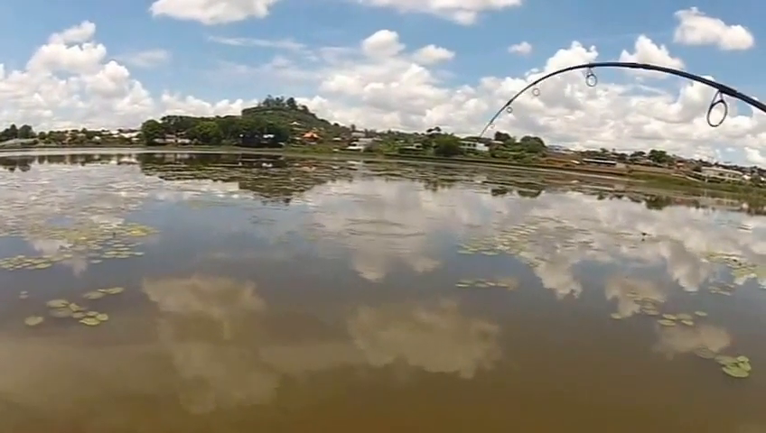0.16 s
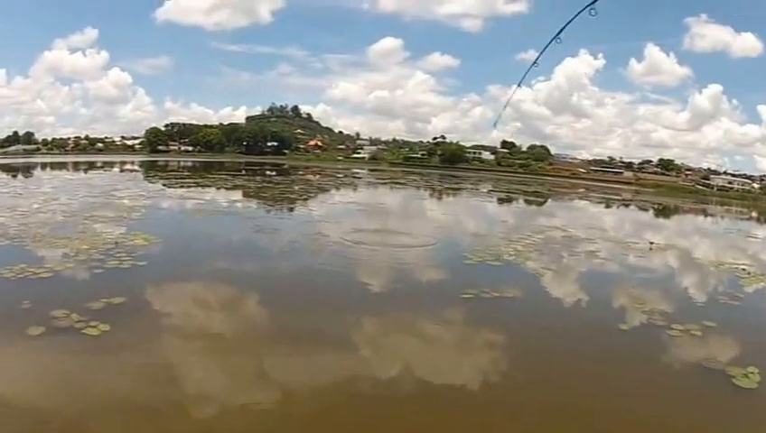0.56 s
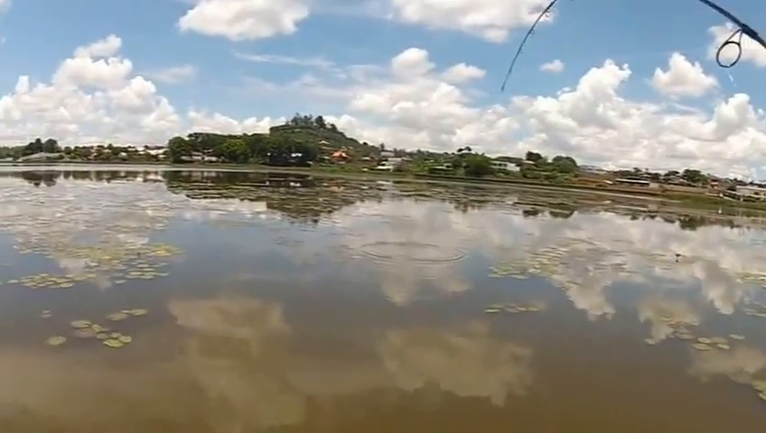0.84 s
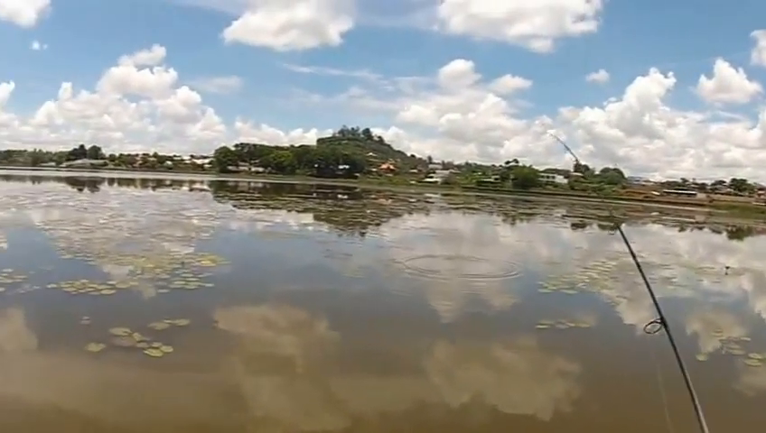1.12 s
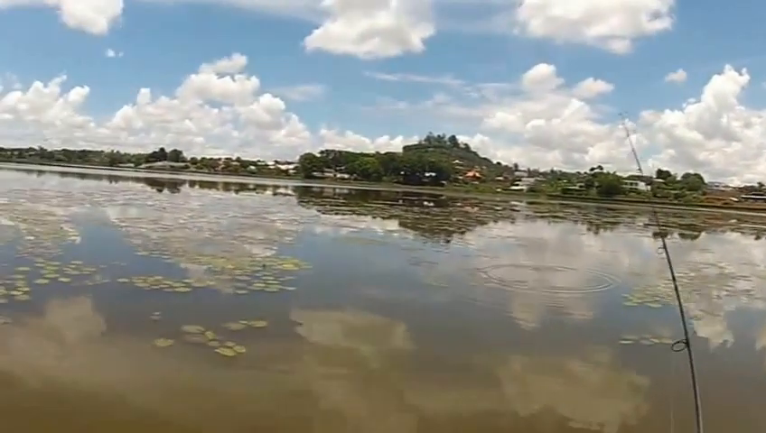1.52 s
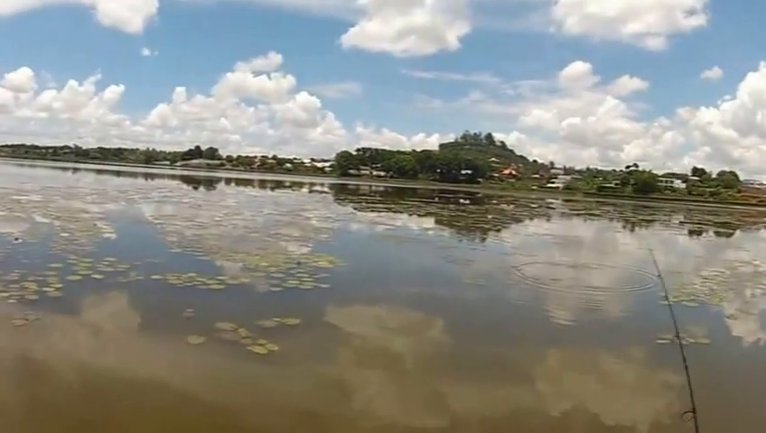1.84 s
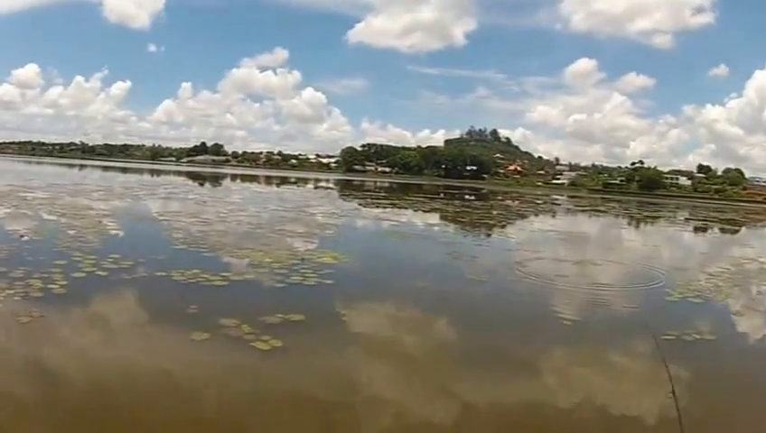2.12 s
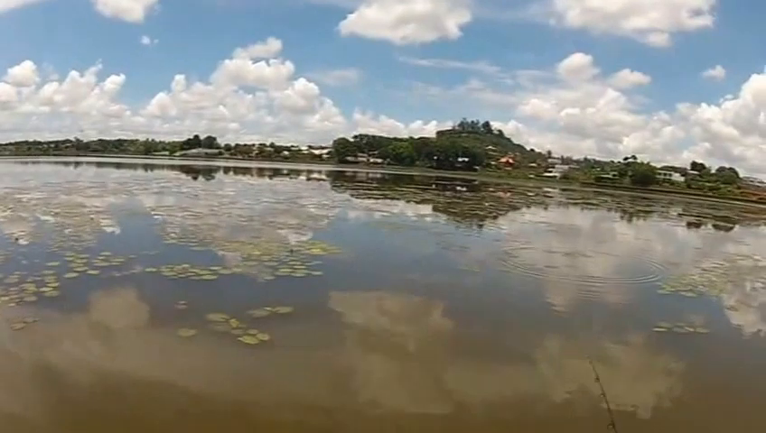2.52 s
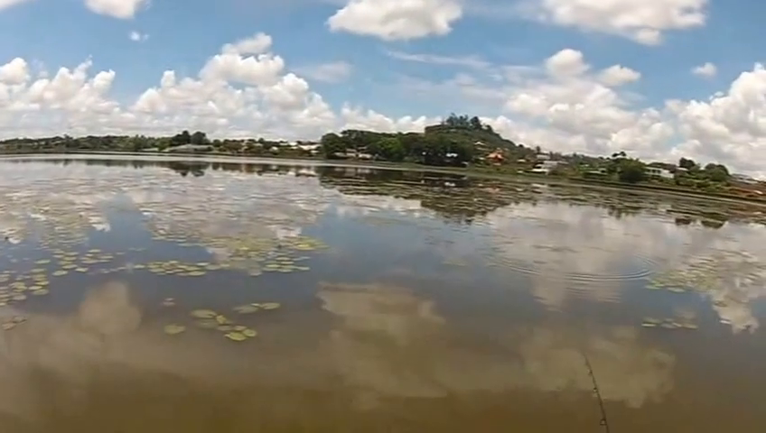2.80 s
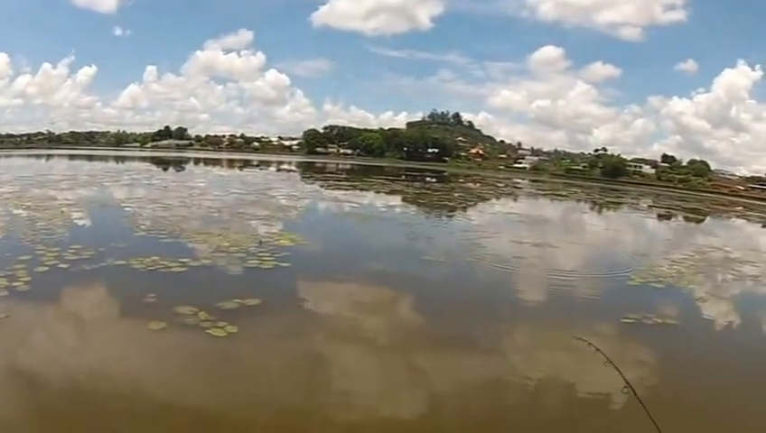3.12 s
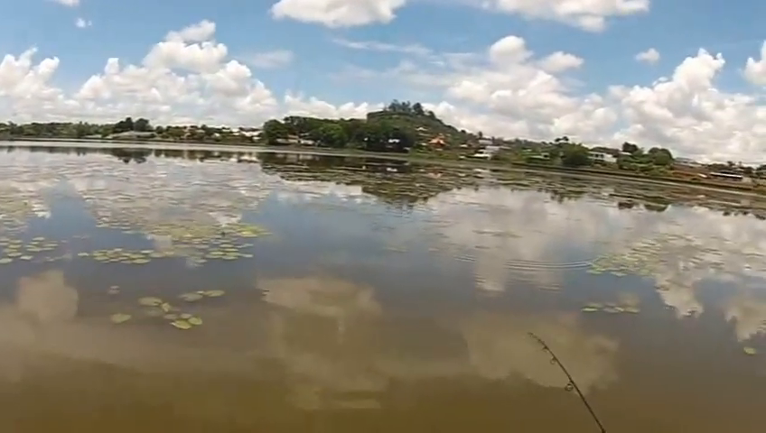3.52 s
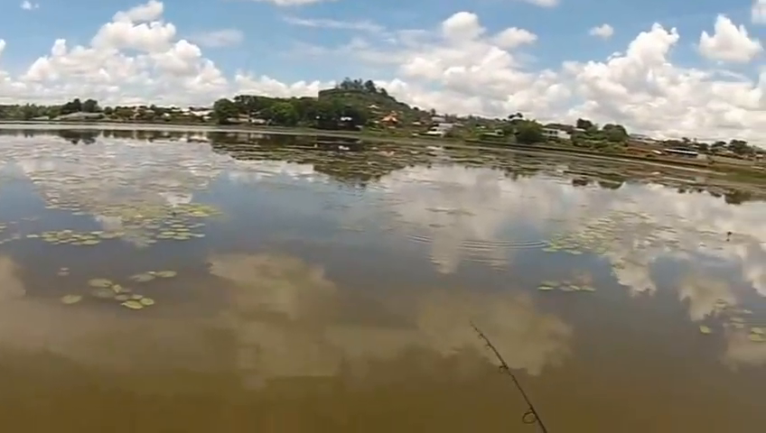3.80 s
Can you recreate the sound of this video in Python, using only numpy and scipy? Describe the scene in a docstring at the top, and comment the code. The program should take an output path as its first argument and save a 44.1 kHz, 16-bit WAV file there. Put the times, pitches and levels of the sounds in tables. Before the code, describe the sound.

A fishing reel clicks and whirs in short metallic bursts beside a calm lake, close up.

```python
"""Beside a calm lake, a fishing reel gives line in short pulls, close to the microphone.
At each tooth the drag's pawl snaps, chatters for a few milliseconds and sets the metal spool ringing;
one pull is fast enough to whir. Snaps are shaped noise, and the ringing is made of dying sine waves.
Behind the reel, filtered noise makes a low outdoor rumble, faint ticks of handling and a few soft bumps."""
import sys
import numpy as np
from scipy import signal
from scipy.io import wavfile
from scipy.ndimage import uniform_filter1d

SR = 44100
rng = np.random.default_rng(int(sys.argv[2]) if len(sys.argv) > 2 else 0)


def put_to_file(sound):
    """Save the sound as 16-bit audio at rate SR, in the file named by the first command-line argument."""
    columns = np.atleast_2d(sound).T  # one column per channel
    safe = np.clip(columns, -1, 1)
    whole_steps = np.round(safe * 32767)
    wavfile.write(sys.argv[1], SR, whole_steps.astype(np.int16))


N = 174195  # length in samples

# The outdoor background. Each row: frequency in Hz, relative level in dB.
AIR_COLOUR = [(26, -42.5), (44, -15), (66, 1), (130, -5.5), (1000, -16), (1800, -23), (3000, -31.5),
              (10500, -46), (16000, -59)]
# How alike the background is at the two ears. Each row: frequency in Hz, likeness (1 is identical).
EAR_LIKENESS = [(90, 0.9), (350, 0.45), (800, 0.05)]
# Rustles of the hand on the rod. Each row: middle in seconds, level in dB, half length in seconds.
RUSTLES = [(1.415, -61, .012), (1.8, -70, .3), (1.958, -60, .012)]
# Teeth passing the pawl. Each row: start in seconds, snap strength in dB,
# then the pawl's ping and the spool's ring, both in dB added to that strength.
TEETH = [(0.0, -39, 9, 7), (0.0211, -23, -3, -11), (0.0396, -28, 4, 4.5), (0.0547, -27, -7, 1),
         (0.0718, -27.5, -1.0, 1), (0.0859, -26, -6, 2.5), (0.1033, -25, -4, 2), (0.1159, -28.0, -9, 10),
         (0.1392, -27, -6, 8.5), (0.1517, -26, -4, -7), (0.1725, -24.5, -12, -2.5), (0.2651, -26.0, 11, 8),
         (0.2973, -23.5, 10.0, -2.5), (0.3265, -25, 8, -2.0), (0.3465, -26.5, 8, 4), (0.3693, -26.0, 3, 1),
         (0.3858, -26.5, 7, 4), (0.4071, -26.5, 9.5, 1.5), (0.4322, -26.5, 2, -1), (0.4712, -26, 10.5, -22),
         (0.529, -24.5, 6.5, -10), (0.564, -25.5, 9.0, -7), (0.597, -27, 4.5, -11), (0.6819, -24.0, 2, 6),
         (0.7014, -26.0, 8, 4.5), (0.7258, -26, -5, 1.5), (0.746, -24.5, -14, -2), (0.7677, -24, -3, -0.5),
         (0.7932, -25.5, 5, -11.0), (0.8134, -23, -2, 1.5), (0.8269, -23.5, 9.5, 0.5),
         (0.8407, -23, 9.0, -2), (0.8545, -24.5, 3.0, 5), (0.8675, -25, 3, -13), (0.8797, -23.5, 2, 5),
         (0.892, -26.5, 4, -5), (0.9043, -27.5, 8, -9.0), (0.9168, -23, -2, -9), (0.9289, -28.5, 12, -10),
         (0.942, -25.5, 13.0, -10), (0.955, -23, 6, -10), (0.9688, -24.0, 7.5, -16),
         (0.9847, -23, 8, -11.0), (0.9979, -26, 13.5, -25), (1.0164, -23.5, 12, -18),
         (1.0318, -22.5, 13, -11), (1.0635, -26.5, 10, -7), (2.7001, -29, 15.5, 7.5),
         (2.7188, -30, 13.5, 6.5), (2.7561, -29.5, 13.5, 5), (2.8268, -24, 9, -3), (2.8624, -24.5, 6, -3),
         (2.904, -25, 7.5, -12), (2.9993, -26, 8, -6), (3.0363, -26.5, 7, -16.0), (3.0792, -24, 3.5, -14),
         (3.1172, -27, 5, -28), (3.1856, -25, 3, -29), (3.2606, -26.5, -0.5, -5), (3.313, -27.0, -3, 4.5),
         (3.3534, -26, 2.5, -9), (3.3682, -32, -3.0, 2), (3.3798, -24, -8, 0.5), (3.3896, -31, -3, 1),
         (3.3987, -26.5, -3, 8.5), (3.4089, -25.5, 15.5, 4), (3.4232, -22, 9.0, -5),
         (3.4325, -24.5, 9.5, -10), (3.4448, -27.5, 19.5, -18), (3.4535, -24, 12, -4),
         (3.4642, -26.5, 6, 5), (3.473, -28, 16, -3), (3.4835, -22.5, 2, 8), (3.493, -26, 4.0, -13),
         (3.5031, -26.5, 10.5, -4.5), (3.5424, -23.5, 3, -3), (3.5502, -30, 4, 3.0), (3.5602, -35, -1, 3),
         (3.5684, -29, -4, 7), (3.5769, -29, -3, 12), (3.5882, -35.5, 9, 6), (3.7094, -34.5, 12, 13.5),
         (3.7204, -32, 13, 11.5), (3.7322, -30, 16.5, 8), (3.7453, -30.5, 9, -1.0), (3.7635, -29, 2, -12)]
# The fast pull. Each row: time in seconds, teeth per second, snap strength in dB,
# then the pawl's ping and the spool's ring, both in dB added to that strength.
FAST_PULL = [(3.598, 125, -30.5, 10, 3), (3.614, 160, -29.5, 16, -2), (3.646, 150, -30, 10, -17),
             (3.668, 120, -27.5, 1.5, -7), (3.703, 130, -28.5, 4, -7)]
# Light touches of the pawl. Each row: start in seconds, strength in dB.
TOUCHES = [(.209, -43), (.5854, -39), (3.29, -34)]
# Colour of the snaps. Each row: frequency in Hz, gain in dB.
SNAP_COLOUR = [(600, -30.5), (2100, -15), (3200, -14.5), (4900, 0.7), (6500, -2), (9000, 0.5),
               (13400, -4.5), (15600, 0.5), (16500, -16.5)]
# Ringing modes of the spool. Each row: level in dB, loose pitch in Hz, loose time to fall 60 dB in
# seconds, pressed pitch in Hz, pressed time to fall 60 dB in seconds.
SPOOL_MODES = [(-1, 3835, .075, 3968, .05), (1.5, 7185, .07, 7325, .05), (-3, 11295, .11, 11512, .05)]
# When the pawl presses on the spool. Each row: start in seconds, end in seconds.
PRESSED_TIMES = [(.16, .335), (.4, .5), (.9, 1.1), (2.8, 3.3)]
# Ring of the spool's lowest mode. Each row: time in seconds, dB added to the snap strength.
LOW_NOTE_LEVEL = [(.26, -13), (.42, -2), (.6, -14), (.68, -4), (.75, -14), (2.86, -7), (3.33, -12),
                  (3.44, -5), (3.76, -9)]
# Short high modes that ring with every snap. Each row: pitch in Hz, level in dB,
# time to fall 60 dB in seconds.
RIM_MODES = [(7320, -9, .035), (10480, -3, .03), (11512, -2, .04), (15690, 1, .035)]
# Lingering modes of the reel's body. Each row: pitch in Hz, level in dB, time to fall 60 dB in seconds.
BODY_MODES = [(1460, -24, .12), (3955, -19, .2), (6135, -16, .2), (15280, -17, .18)]
# How freely the body rings. Each row: time in seconds, added level in dB.
BODY_LEVEL = [(.7, -19), (1.0, 1), (2.7, -23)]
# Soft bumps. Each row: middle in seconds, level in dB, pitch in Hz.
BUMPS = [(.61, -39, 570), (.955, -42.5, 885), (1.855, -41.5, 710), (3.59, -41, 850)]

# Background: overall level, gain of the left ear's noise, typical depth of the drifting patches
AIR_DB, LEFT_DB, PATCH_DB = -42, -1.3, 1.2
# Handling ticks: rate, level, pitch and width of their resonance, unevenness, fading time
TICKS_PER_S, TICK_DB, TICK_HZ, TICK_WIDTH_HZ = 90, -69, 5400, 6000
TICK_SPREAD_DB, TICK_S = 2.2, .006
# Snap: fading times in seconds of the first hit and of the rattle, and the parts' relative levels
SNAP_S, RASP_DB, RASP_S = .0005, -6, .0045
REBOUND_S, REBOUND_DB, BLOW_S = 0.0042, -0.5, 0.0031
SPIKE_DB, CONTACT_DB = -1.5, 7.5
# Scrape between teeth: it fades when they come further apart than SCRAPE_S
SCRAPE_DB, SCRAPE_S, GRAIN_DB = -5, 0.024, 4.5
# Pawl ping: two pitches, the rise of the lower one with tooth rate, its longest fading time, its waver
PAWL_HZ, PAWL_FREE_HZ, PAWL_RISE_HZ, FAST_PER_S = 10520, 11440, 430, 150
PAWL_S, PAWL_WOBBLE_HZ = 0.0062, 160
FREE_DB, FREE_WIDTH_DB = 3, 6  # spool ring at which both pitches are equal, and softness of the change
# Rings: random spread of pitch and level, and time to build up
DETUNE_HZ, MODE_SPREAD_DB, RING_RISE_S = 30, 2.2, 0.0019
UNEVEN_DB = 2  # random spread of the teeth in the fast pull
BUMP_S, BUMP_WIDTH = 0.02, .45  # swell time; resonance width as a share of the pitch
EDGE_HZ = 16600  # the treble is cut off above this pitch


def amp(db):
    """Turns decibels into a gain."""
    return 10 ** (np.asarray(db) / 20)


def evened(x):
    """Scales to an average power of 1."""
    return x / np.sqrt(np.mean(x ** 2) + 1e-20)


def read(points, hz):
    """Reads a table between its rows, on a logarithmic frequency axis."""
    table_hz, value = np.transpose(points)
    return np.interp(np.log(hz + 1), np.log(table_hz + 1), value)


def add(mix, s, sound):
    """Mixes a sound in at time s."""
    part = mix[max(round(s * SR), 0):][:len(sound)]
    part += sound[:len(part)]


def resonate(x, hz, width_hz):
    """Passes sound through one resonance, which favours frequencies near hz."""
    r = np.exp(-np.pi * width_hz / SR)
    pole = r * np.exp(2j * np.pi * hz / SR)
    return signal.lfilter([1 - r], [1, -pole], x).real


def colour(x, points, size=2048):
    """Filters to the given spectrum without smearing sound ahead of each hit."""
    hz = abs(np.fft.fftfreq(size, 1 / SR))
    log_gain = np.log(amp(read(points, hz)))
    # The Hilbert transform supplies the phase that puts the response after the hit
    response = np.exp(signal.hilbert(log_gain).conj())
    taps = np.fft.ifft(response).real[:size // 2]
    return signal.oaconvolve(x, taps)[:len(x)]


def blow(x):
    """Gives a burst the energy of a sound with average power 1 lasting BLOW_S."""
    return x * np.sqrt(BLOW_S * SR / np.sum(x ** 2))


def air(size=4096):
    """Outdoor rumble and faint hiss: noise built from short spectra, with patches that drift in level."""
    hop = size // 4
    frames, hz = N // hop + 5, np.fft.rfftfreq(size, 1 / SR)
    a, b, c, d, patches = rng.standard_normal((frames, len(hz), 5)).T
    # Smooth the patches over frequency, then over time
    patches = uniform_filter1d(patches, size=40, axis=0)
    patches = evened(uniform_filter1d(patches, size=6, axis=1))
    same = np.clip(read(EAR_LIKENESS, hz), -1, 1)[:, None]
    left, other = a + 1j * b, c + 1j * d
    right = same * left + np.sqrt(1 - same ** 2) * other
    spectra = np.array([left * amp(LEFT_DB), right])
    spectra *= amp(read(AIR_COLOUR, hz)[:, None] + PATCH_DB * patches)
    sound = signal.istft(spectra, nperseg=size, noverlap=size - hop)[1]
    return amp(AIR_DB) * evened(sound[:, :N])


def handling():
    """Faint ticks of line and hand on the rod: random fading noise grains that swell into rustles."""
    t = np.arange(N) / SR
    happens = rng.random(N) < TICKS_PER_S / SR
    sizes = amp(TICK_SPREAD_DB * rng.exponential(size=N)) * happens
    fading = signal.lfilter([1], [1, -np.exp(-1 / (TICK_S * SR))], sizes)
    ticks = fading * rng.standard_normal(N)
    ticks = resonate(resonate(ticks, TICK_HZ, TICK_WIDTH_HZ), TICK_HZ, TICK_WIDTH_HZ)
    level = amp(TICK_DB)
    for s, db, half_length in RUSTLES:
        level = level + amp(db) * np.exp(-np.square((t - s) / half_length))
    return level * evened(ticks)


def contact(t, gap):
    """The pawl lands with a spike, rattles, rebounds and scrapes up to the next tooth, gap seconds on."""
    late = t - REBOUND_S * rng.uniform(0.17, 1.5)
    rebound = amp(REBOUND_DB) * (late > 0) * np.exp(-abs(late) / SNAP_S)
    shape = np.exp(-t / SNAP_S) + amp(RASP_DB) * np.exp(-t / RASP_S) + rebound
    rattle, scrape = rng.standard_normal((2, len(t)))
    spike = 1. * (t == 0)
    hit = blow(shape * rattle) + amp(SPIKE_DB) * blow(spike)
    # A quick second touch colours each snap anew
    second = np.roll(hit, round(rng.rayleigh(SNAP_S) * SR))
    hit = blow(hit + rng.random() * second)
    # Slow random swings in level make the scrape grainy
    swings = evened(uniform_filter1d(rng.standard_normal(len(t)), size=40))
    scrape = evened(scrape * amp(GRAIN_DB * swings))
    scrape_level = amp(SCRAPE_DB) * np.exp(-(gap / SCRAPE_S) ** 2)
    scrape = scrape * scrape_level * (t < gap) * np.exp(-t / SCRAPE_S)
    return amp(CONTACT_DB) * (hit + scrape)


def pawl(t, gap, spool_db):
    """A short wavering ping; it moves to the higher mode when the spool rings freely."""
    free = 1 / (1 + np.exp((FREE_DB - spool_db) / FREE_WIDTH_DB))
    speed = min(1 / (gap * FAST_PER_S), 1)
    low_hz = PAWL_HZ + PAWL_RISE_HZ * speed ** 2
    ping = 0
    for hz, share in ((low_hz, 1 - free), (PAWL_FREE_HZ, free)):
        waver = evened(uniform_filter1d(rng.standard_normal(len(t)), size=30))
        turns = np.cumsum(hz + PAWL_WOBBLE_HZ * waver) / SR
        ping = ping + np.sqrt(share) * np.sin(2 * np.pi * turns)
    fade = np.exp(-(t / min(PAWL_S, gap / 2)) ** 2)
    rise = 1 - np.exp(-2 * t / SNAP_S)
    return blow(ping * fade * rise)


def ring(modes, t):
    """Metal modes as dying sine waves, struck a little differently each time."""
    hz, db, t60 = np.transpose(modes)[:, :, None]
    tune, strength, phase = rng.standard_normal((3, len(modes), 1))
    waves = np.sin(2 * np.pi * ((hz + DETUNE_HZ * tune) * t + phase))
    levels = amp(db + MODE_SPREAD_DB * strength - 60 * t / t60)
    rise = 1 - np.exp(-t / RING_RISE_S)
    return rise * np.sqrt(2) * (levels * waves).sum(0)


def spool(s, t, ring_db):
    """The spool's modes, higher and shorter while the pawl presses on it."""
    pressed = any(start <= s < end for start, end in PRESSED_TIMES)
    low_db = np.interp(s, *np.transpose(LOW_NOTE_LEVEL))
    modes = []
    for row, level in zip(SPOOL_MODES, (low_db, ring_db, ring_db)):
        db, loose_hz, loose_t60, pressed_hz, pressed_t60 = row
        hz, t60 = (pressed_hz, pressed_t60) if pressed else (loose_hz, loose_t60)
        modes.append((hz, db + level, t60))
    return ring(modes, t)


def reel(size=8192):
    """Each tooth gives a snap, a ping of the pawl and a longer ring of spool, rim and body."""
    snaps, metal, t = np.zeros(N), np.zeros(N), np.arange(size) / SR
    teeth = list(TEETH) + whir()
    starts = np.array([row[0] for row in teeth])
    for s, db, pawl_db, spool_db in teeth:
        gap = np.min(starts[starts > s], initial=N / SR) - s
        # The next tooth chokes the spool
        choke = np.exp(-np.maximum(t - gap, 0) / BLOW_S)
        body_gain = amp(np.interp(s, *np.transpose(BODY_LEVEL)))
        body = ring(RIM_MODES, t) + body_gain * ring(BODY_MODES, t)
        ping = amp(pawl_db) * pawl(t, gap, spool_db)
        add(snaps, s, amp(db) * contact(t, gap))
        add(metal, s, amp(db) * (ping + choke * spool(s, t, spool_db) + body))
    for s, db in TOUCHES:
        touch = np.exp(-t / SNAP_S) * rng.standard_normal(size)
        add(snaps, s, amp(db) * blow(touch))
    return colour(snaps, SNAP_COLOUR) + metal


def bumps():
    """Brief, hollow swells of resonant noise, different at each ear."""
    t, out = np.arange(N) / SR, np.zeros((2, N))
    for s, db, hz in BUMPS:
        noise = rng.standard_normal((2, N))
        hollow = resonate(resonate(noise, hz, BUMP_WIDTH * hz), hz, BUMP_WIDTH * hz)
        swell = np.exp(-.5 * ((t - s) / BUMP_S) ** 2)
        out += amp(db) * evened(hollow) * swell
    return out


def whir():
    """Lists one click, of uneven strength, for each tooth that passes during the fast pull."""
    times, rate, *controls = np.transpose(FAST_PULL)
    s, rows = times[0], []
    while s < times[-1]:
        db, pawl_db, spool_db = [np.interp(s, times, c) for c in controls]
        rows.append((s, db + UNEVEN_DB * rng.standard_normal(), pawl_db, spool_db))
        s += 1 / np.interp(s, times, rate)
    return rows


def scene():
    """The reel and the handling dead centre, the bumps and the outdoors spread over both ears."""
    return air() + handling() + reel() + bumps()


def record(dry):
    """Cuts the treble above EDGE_HZ with a steep filter."""
    low_pass = signal.firwin(255, EDGE_HZ, window=("kaiser", 8), fs=SR)
    return signal.oaconvolve(dry, low_pass[None], "same")


dry = scene()
out = record(dry)
put_to_file(out)
```